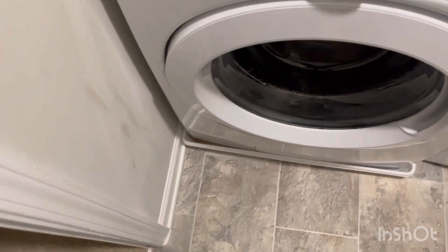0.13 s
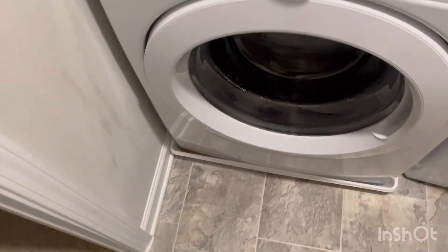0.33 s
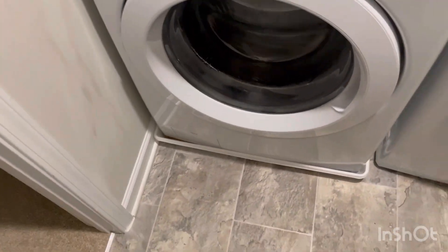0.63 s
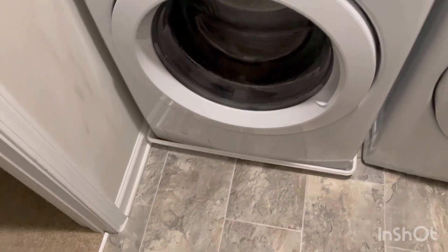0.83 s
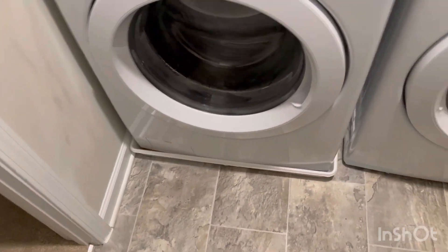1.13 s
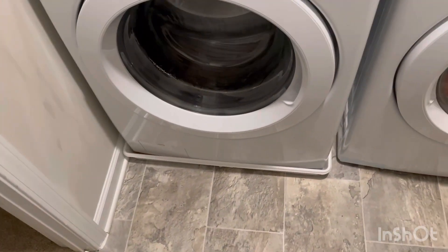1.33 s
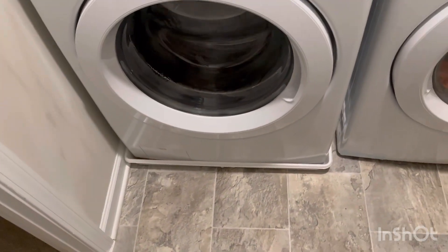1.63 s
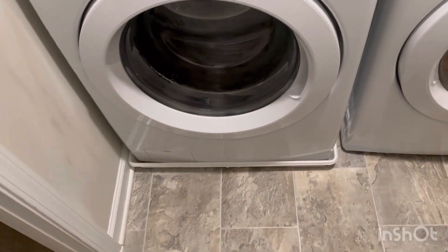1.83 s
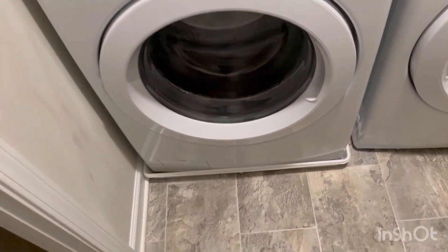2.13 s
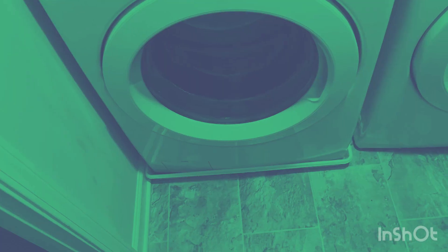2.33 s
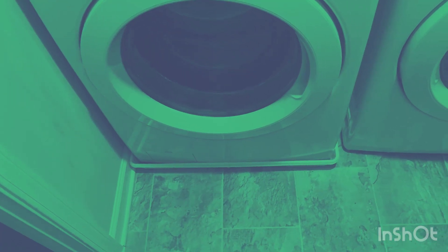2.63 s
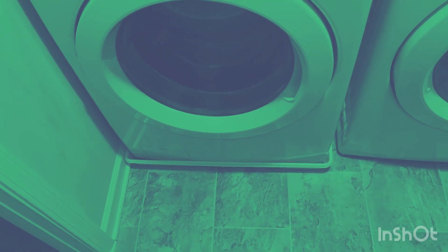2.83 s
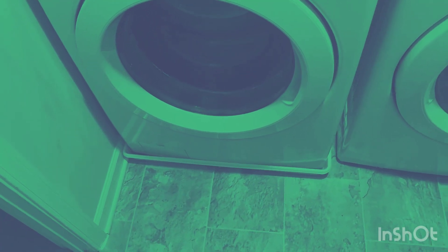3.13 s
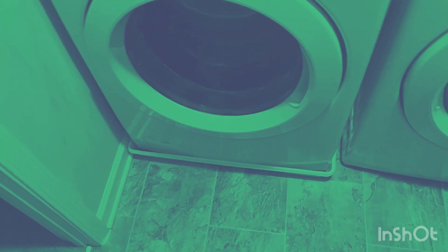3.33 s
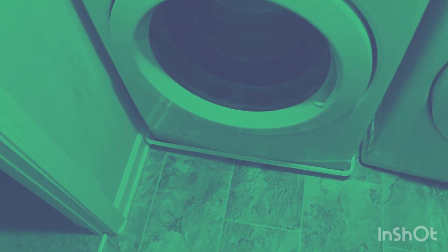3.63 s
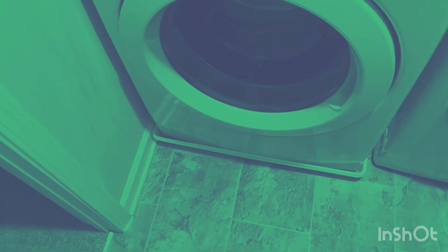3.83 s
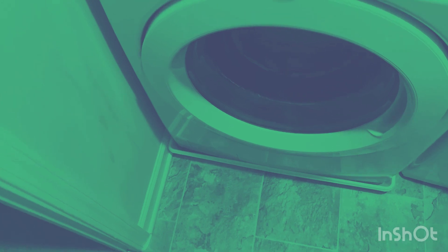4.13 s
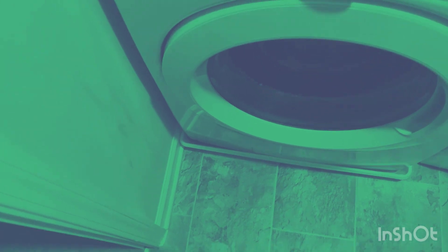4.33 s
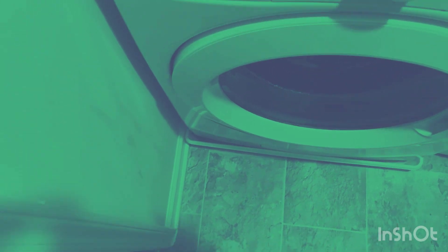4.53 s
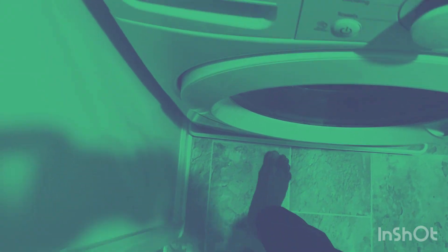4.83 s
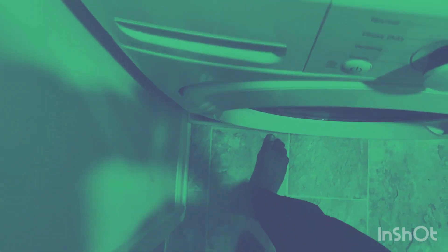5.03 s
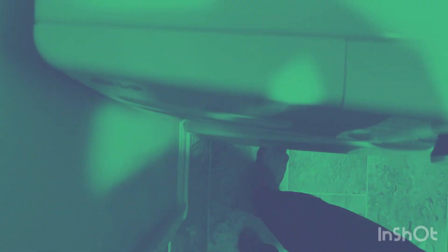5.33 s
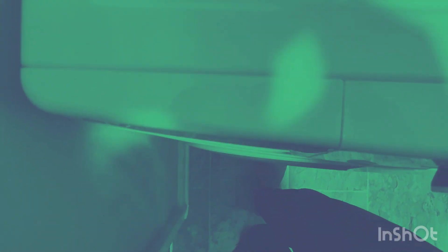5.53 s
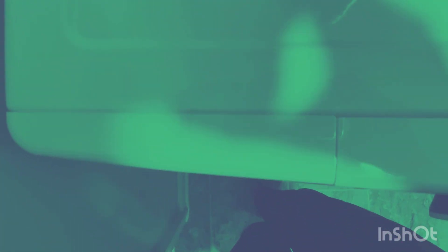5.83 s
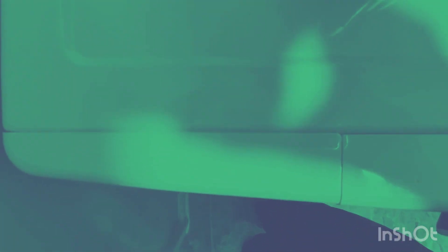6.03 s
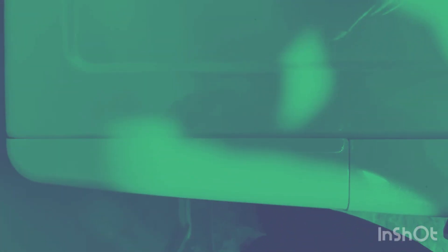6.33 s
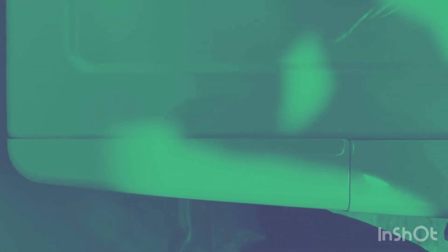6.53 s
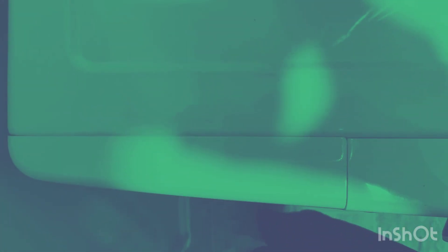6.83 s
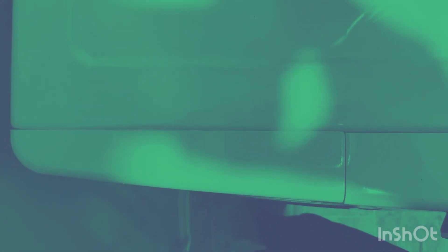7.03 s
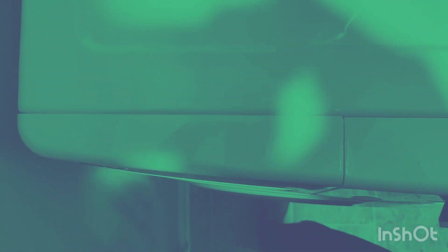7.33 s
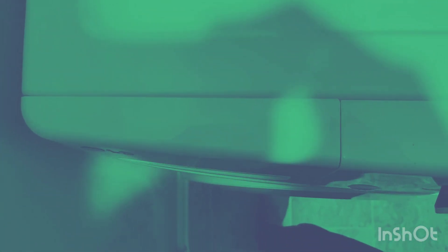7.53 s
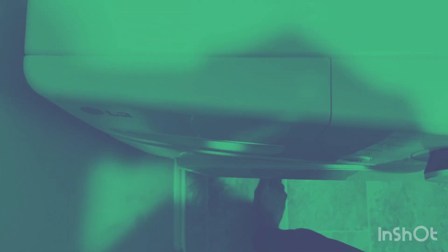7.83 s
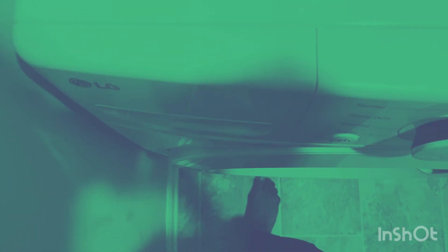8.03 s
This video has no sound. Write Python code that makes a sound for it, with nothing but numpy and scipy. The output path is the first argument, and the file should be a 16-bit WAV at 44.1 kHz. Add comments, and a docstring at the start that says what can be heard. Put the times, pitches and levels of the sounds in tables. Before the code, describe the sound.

A front-loading washing machine spins at full speed in a small tiled nook, at first loud and harsh, with a rattling buzz and hiss over its rushing whir. After about two seconds it cuts abruptly to a much quieter, wider hum with a thin, high motor whine. Cloth rustles faintly near the hand-held microphone, and the drone grows fuller in the bass as the microphone moves from the door to above the lid.

```python
"""A loud, buzzing washer at full spin narrows to mono, cuts out at 2.3 s and fades back in, wide and
at natural volume. It is a front-loader in a tiled nook, heard by a hand-held microphone that moves from
the door to above the lid. The drum shakes the cabinet at multiples of its speed (orders), air and
bearings rush and set the panels ringing, the motor drive whines, and cloth rustles close by."""
import sys
import numpy as np
from scipy import signal
from scipy.fft import rfft, irfft
from scipy.io import wavfile
from scipy.ndimage import uniform_filter1d, minimum_filter1d

SR = 44100
rng = np.random.default_rng(int(sys.argv[2]) if len(sys.argv) > 2 else 0)


def dump_mix(stems):
    """Bounce the given channels to the path in sys.argv[1] as a 16-bit WAV at rate SR."""
    frames = np.atleast_2d(stems).T  # one column per channel
    limited = np.clip(frames, -1, 1)  # hard clip at full scale
    pcm = np.round(limited * 32767).astype(np.int16)
    wavfile.write(sys.argv[1], SR, pcm)


N = 360738
DRUM_HZ = 19.4025
# Lift from the nook's standing waves, a row per place from door to lid:
# level/dB of panels below 2.4 kHz, to 3 kHz, to 4.5 kHz, above; level/dB of the whistling drum orders
NOOK_LIFT_DB = [(4, .4, -1, -2.5, -2.5), (-2, 1, .5, 0, 1), (-10, -9, -.5, -6, -2), (3, 0.5, .5, 1.5, 6),
                (0, -1, 0.8, -0.5, -1), (5, 1, .5, 1, 1), (6.5, 1, 1, 1, -1), (1, 5.5, 1.5, 1.5, 4),
                (2.5, 5, .5, -1, 3.5), (1.5, 1, 0.92, 1.5, 2)]


def undb(db):
    return np.exp(np.asarray(db) * np.log(10) / 20)


def curve(table):
    """A line through (t/s, value) points, for every sample."""
    return np.interp(np.arange(N) / SR, *np.transpose(table))


def along(table, place):
    """A table's columns, read wherever the microphone is."""
    row_places = (0, .1, .2, .31, .42, .53, .63, .74, .85, 1)  # place of each row: 0 at the door, 1 at the lid
    return [np.interp(place, row_places, column) for column in np.transpose(table)]


def walk(rate_hz):
    """Random values held for 1 / rate_hz and smoothed twice; spread near 1."""
    hold = int(SR / rate_hz)
    steps = np.repeat(rng.standard_normal(N // hold + 1), hold)
    return 1.65 * uniform_filter1d(uniform_filter1d(steps, hold), hold)[:N]


def tone(turns, db):
    return np.sqrt(2) * undb(db) * np.cos(2 * np.pi * turns)


def band(lo_hz, hi_hz, size=N):
    """Two unrelated noises between the edges, rms 1."""
    bandpass = signal.butter(2, (lo_hz, hi_hz), "bandpass", fs=SR, output="sos")
    noise = signal.sosfilt(bandpass, rng.standard_normal((2, size)))
    return noise / noise.std()


def coloured(hz, db):
    """Noise with the given dB per Hz."""
    bins_hz = np.maximum(np.arange(N // 2 + 1) * SR / N, 1.)
    shape_db = np.interp(np.log(bins_hz), np.log(hz), db)
    return irfft(rfft(rng.standard_normal(N)) * undb(shape_db) * np.sqrt(SR / 2), N)


def drum_hum(place):
    """Every turn repeats the same shake; its strong orders wax and wane across the standing waves."""
    mid_orders, side_orders = (3, 5, 12, 21, 24, 36, 48), (21, 24, 36, 48)
    # Standing waves, a row per place: level/dB of each mid order, then of each side order
    standing_waves = [(-38, -56, -45.5, -37, -41, -40, -56.5, -58, -48, -39, -40),
                      (-38.5, -53.5, -45, -34.5, -34.5, -36.5, -49.5, -45, -37, -49, -58),
                      (-38, -47, -44.5, -34.5, -44, -39, -51.5, -41, -50, -48, -46),
                      (-46, -44, -39, -35.5, -35, -50, -45.5, -40, -45, -43, -42),
                      (-57, -43.5, -36, -35.5, -36, -38, -42.5, -46, -38, -44, -48),
                      (-51, -42, -39, -36, -36, -35, -41.5, -53, -28, -48, -51),
                      (-42, -36, -36.5, -38, -33, -48, -49.5, -45, -30.5, -57, -42),
                      (-39, -33, -39, -36.5, -24.5, -50, -54.5, -39, -28.5, -43.5, -51.5),
                      (-38, -33.5, -43, -34, -22.5, -56.5, -50.5, -40, -32, -43, -51.5),
                      (-35, -32.5, -41, -34.5, -22.5, -42.5, -50.5, -45.5, -32.5, -41, -56.5)]
    side_leads = [(.45, -0.3, 0, -0.074), (.45, -0.24, 0, -0.2), (.35, -0.32, 0.25, -0.38),
                  (.26, -.24, 0.34, -0.21), (.1, 0.16, -0.17, -0.017), (0, -0.23, -.4, -.37),
                  (0, -0.78, -.71, -0.86), (-.05, -0.74, -.66, -.65), (-.1, -0.68, -.6, -.5),
                  (-.09, -0.68, -.5, -.7)]  # a row per place: lead over mid/turns of each side order
    wavers = (.6, 0.64, 0.78, .7, 0.6, 1.1, 0.78)  # waver depth/dB of each mid order
    turns = DRUM_HZ * np.arange(N) / SR
    levels = along(standing_waves, place)
    phase = {k: k * turns + rng.random() for k in mid_orders}
    mid = sum(tone(phase[k], db + depth * walk(9)) for k, db, depth in zip(mid_orders, levels, wavers))
    mid += undb(levels[0] - 6.5) * band(58, 74)[0]  # rumble blurs the lowest hum
    side = sum(tone(phase[k] + lead, db)
               for k, lead, db in zip(side_orders, along(side_leads, place), levels[len(mid_orders):]))
    return np.array([mid, side])


def drum_whirr(place, lid):
    """The weaker orders of the shake, blurred toward the top as the drum speed hunts."""
    orders = (4, 6, 7, 8, 9, 10, 11, 13, 14, 15, 16, 18, 19, 20, 22, 23, 25, 27, 33, 45, 66, 96, 106, 144,
              168, 192, 240, 288)  # multiples of the drum speed
    # A row per order: level/dB of mid at door, mid at lid, side at door, side at lid
    levels = [(-59,-41.5,-57.5,-68.5),(-71.5,-43,-57,-60.5),(-45.5,-38.5,-68.5,-61.5),(-47.5,-39.5,-66.5,-62.5),(-67,-43,-64.5,-60),(-53.5,-53,-72,-68),
              (-55,-47.5,-62.5,-55),(-61.5,-38,-53,-51.5),(-51.5,-41.5,-54,-49),(-51.5,-40.5,-57.5,-62),(-65.5,-49,-58,-54),(-46.5,-53.5,-55,-44),(-56,-57,-65.5,-64.5),
              (-57,-42.5,-61.5,-61),(-56.5,-54,-62,-45),(-48,-42,-58,-54),(-51,-54,-50.5,-50.5),(-55,-61,-54.5,-50.5),(-55,-69,-48,-61),(-74,-66.5,-59,-65),(-59.5,-65.5,-64,-67),
              (-61.5,-61.5,-63.5,-64),(-65,-64.5,-82.5,-72.5),(-67.5,-66,-66.5,-80.5),(-71.5,-70.5,-78.5,-72),(-71,-74,-83.5,-77),(-78.5,-72,-81,-75),(-79.5,-74.5,-86,-85.5)]
    turns = DRUM_HZ * np.arange(N) / SR + .001 * walk(15)
    out = np.zeros((2, N))
    for k, (door_mid, lid_mid, door_side, lid_side) in zip(orders, levels):
        mid_phase, side_phase = rng.random(2)
        waver_db = 1.2 * walk(4.9)  # the wet load and the hand both shift a little
        if k >= 140:  # the top orders whistle unsteadily
            waver_db += along(NOOK_LIFT_DB, place)[-1] + 1.2 * walk(30)
            mid_phase += .12 * walk(70)
        out[0] += tone(k * turns + mid_phase, door_mid + (lid_mid - door_mid) * lid + waver_db)
        out[1] += tone(k * turns + side_phase, door_side + (lid_side - door_side) * lid + waver_db)
    return out


def rush(lid):
    """Broad noise of air and bearings, fuller in the bass above the lid, throbbing faintly once a turn."""
    # Rush spectrum: f/Hz, then level/dB per Hz of mid at door, mid at lid, side at door, side at lid
    spectrum = [(28, -77, -75.5, -92, -92.5), (55, -60.5, -62.5, -74, -73), (107, -62, -53.5, -71.5, -75.5),
                (206, -68.5, -60, -76.5, -71), (469, -61, -56, -75.5, -66.5), (586, -67, -66, -73, -67),
                (800, -69, -68.5, -73, -71.5), (1274, -74, -74, -74, -72.5), (2150, -84, -83, -89, -87),
                (3920, -93.5, -93.5, -94.5, -94.5), (5400, -100, -99, -104.5, -99),
                (7000, -106, -109, -105, -106), (8260, -130, -130, -106, -108),
                (10500, -113, -115, -117, -120), (11900, -111, -110, -137, -137),
                (12700, -103, -102, -116, -115), (13600, -104, -104, -106, -106),
                (14900, -108, -106, -101, -100), (15300, -135, -135, -94.5, -92),
                (15700, -138, -138, -91, -88.5)]
    hz, *levels = np.transpose(spectrum)
    door_mid, lid_mid, door_side, lid_side = (coloured(hz, db) for db in levels)
    from_door = np.sqrt(1 - lid) * np.array([door_mid, door_side])
    from_lid = np.sqrt(lid) * np.array([lid_mid, lid_side])
    throb_db = .26 * np.cos(2 * np.pi * DRUM_HZ * np.arange(N) / SR)
    return undb(throb_db) * (from_door + from_lid)


def panel_ring(place):
    """The rush stirs the panels into narrow, noisy rings that each flicker in their own time."""
    resonances = [(1034, 90, -57.5, -62), (1356, 140, -55, -62), (1867, 63, -69, -66.5),
                  (2082, 62, -67, -69), (2608, 150, -61, -64.5), (3440, 220, -66.5, -69),
                  (4320, 180, -66, -68.5), (4680, 110, -72.5, -71.5), (4895, 210, -65.5, -67.5),
                  (5490, 200, -77, -76.5), (14120, 250, -74, -71.5), (14700, 200, -78, -74),
                  (15500, 300, -100, -64)]  # f/Hz, width/Hz, mid level/dB, side level/dB
    lifts_db = along(NOOK_LIFT_DB, place)
    out = np.zeros((2, N))
    for hz, width_hz, mid_db, side_db in resonances:
        lift_db = lifts_db[np.searchsorted((2400, 3000, 4500), hz)]
        flicker_db = .4 * walk(3.1) + 1.4 * walk(30)
        ring = band(hz - width_hz / 2, hz + width_hz / 2)
        out += undb([[mid_db], [side_db]] + lift_db + flicker_db) * ring
    return out


def motor_whine():
    """The drive's thin switching tones waver, throb once a turn and drift slightly in pitch."""
    switching_tones = [(12694, -72.5, -79), (12888, -79.5, -94), (13162, -79, -83), (13394, -85, -90),
                       (13916, -82.5, -80), (13975, -80.5, -78.5), (14110, -78, -71.5), (14266, -83, -75),
                       (14545, -78.5, -71), (14691, -82, -72), (15025, -90.5, -70.5), (15488, -100, -65),
                       (15720, -100, -70)]  # f/Hz, mid level/dB, side level/dB
    out, t = np.zeros((2, N)), np.arange(N) / SR
    for hz, mid_db, side_db in switching_tones:
        turns = hz * t + .15 * walk(9.7) + rng.random()
        waver_db = 1.1 * walk(3) + 1.8 * walk(18)
        throb_db = 2.5 * np.cos(2 * np.pi * (DRUM_HZ * t + rng.random()))
        out[0] += tone(turns, mid_db + waver_db + throb_db)
        out[1] += tone(turns + rng.random(), side_db + waver_db + throb_db)
    return out


def loud_opening(mid):
    """A limited boost with treble hiss; rapid, regular dips in gain add a buzz of ticks."""
    boost_db, threshold, ratio, window = 25.5, .3, 3, int(.005 * SR)
    dip_gain, first_dip, period, recovery = .31, 206, 512, 49  # the last three in samples
    boosted = mid * undb(boost_db)
    peak = uniform_filter1d(-minimum_filter1d(-np.abs(boosted), window), window)
    limited = boosted * np.minimum(threshold / (peak + 1e-9), 1) ** (1 - 1 / ratio)
    since_dip = (np.arange(N) - first_dip) % period
    dips = np.minimum(dip_gain + (1 - dip_gain) * since_dip / recovery, 1)
    hiss = undb(-66) * band(5900, 10000)[0]
    return limited * dips, hiss


def cloth_rustle():
    """Brushing cloth makes soft swells of grainy treble; one scuff squeaks in short rising chirps."""
    brushes = [(0.315, -56.5, 0.018, 4000, 12000), (0.51, -62, 0.012, 4000, 13000),
               (1.647, -69, .02, 5000, 12000), (1.894, -63, 0.03, 4000, 9000),
               (2.662, -62, .025, 4000, 11500), (2.93, -62, 0.016, 4500, 11500),
               (4.071, -62, .018, 4500, 11500), (4.247, -55, 0.012, 3500, 8500),
               (4.33, -68, .04, 5000, 11500), (4.703, -54, .016, 2700, 3880),
               (4.702, -58, 0.014, 3000, 9000), (5.07, -70, .03, 9000, 12000),
               (3.627, -64, .001, 8500, 12500)]  # t/s, level/dB, rise/s, lowest f/Hz, highest f/Hz
    squeaks = [(4.698, 3400, -52, .008), (4.701, 2650, -55, .008), (4.703, 4180, -58, .003),
               (4.724, 3050, -55, .006), (4.742, 3080, -56, .006)]  # t/s, f/Hz, level/dB, half-length/s
    fall_over_rise, faint_band_hz, chirp_hz_per_s = 2.3, (7460, 9400), 9000
    out, grain = np.zeros((2, N)), undb(1.7 * walk(300))
    t = np.linspace(-.2, .2, int(.4 * SR))
    for at_s, db, rise_s, lo_hz, hi_hz in brushes:
        start = int(at_s * SR) - len(t) // 2
        swell = np.exp(-(t / (rise_s * np.where(t > 0, fall_over_rise, 1))) ** 2)
        out[:, start:start + len(t)] += undb(db) * swell * band(lo_hz, hi_hz, size=len(t))
    out = signal.sosfilt(signal.butter(3, faint_band_hz, "bandstop", fs=SR, output="sos"), out)
    for at_s, hz, db, half_s in squeaks:
        start = int(at_s * SR) - len(t) // 2
        turns = hz * t + chirp_hz_per_s * t ** 2 / 2 + rng.random()
        out[0, start:start + len(t)] += np.exp(-(t / half_s) ** 2) * tone(turns, db)
    return out * grain


def scene():
    """All layers, built as mid and side along the microphone's way, then spread to left and right."""
    path = [(0, 0.42), (.35, 0.32), (.6, 0.2), (.9, 0.058), (1.4, 0.021), (1.6, 0.04), (2.2, 0.11),
            (2.55, 0.093), (3.0, 0.02), (3.3, 0.019), (3.75, 0.079), (4.0, 0.21), (5.5, 0.83), (5.8, 1),
            (7.15, 0.99), (7.5, 0.84), (7.95, 0.75), (8.18, 0.67)]  # up over the front edge: t/s, place (0 at the door, 1 at the lid)
    place = curve(path)
    lid = np.interp(place, (.17, .78), (0, 1))  # the lid's sound takes over from the door's
    drum = drum_hum(place) + drum_whirr(place, lid)
    mid, side = drum + rush(lid) + panel_ring(place) + motor_whine() + cloth_rustle()
    return np.array([mid + side, mid - side])


def record(dry):
    """The loud opening folds to mono and cuts out; the natural level fades in; the very top is shaved."""
    fold_to_mono = [(0, 4.5), (.3, -4), (.6, -10.5), (.8, -34), (.88, -52), (.9, -120)]  # t/s, side gain/dB
    cut, edge = 100382, 60  # samples: where the opening stops, how long a cut is rounded
    fade_start_s, fade_s, top_hz = 2.291, .052, 15690
    n = np.arange(N)
    opening = n < cut
    cut_out = np.clip((cut - n) / edge, 0, 1)
    fade = np.clip((n / SR - fade_start_s) / fade_s, .03, 1) * np.minimum((N - n) / edge, 1)
    mid, side = (dry[0] + dry[1]) / 2, (dry[0] - dry[1]) / 2
    loud, hiss = loud_opening(mid)
    dull_side = signal.sosfilt(signal.butter(4, 3000, fs=SR, output="sos"), side)
    mid = np.where(opening, loud * cut_out + hiss, mid * fade)
    side = np.where(opening, dull_side * undb(curve(fold_to_mono)), side * fade)
    lowpass = signal.ellip(12, .2, 80, top_hz, fs=SR, output="sos")
    return signal.sosfilt(lowpass, np.array([mid + side, mid - side]))


dry = scene()
out = record(dry)
dump_mix(out)
```